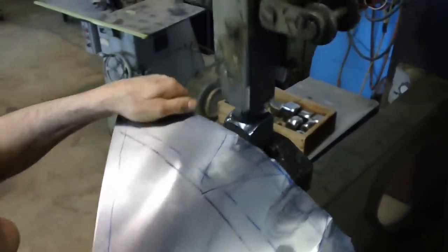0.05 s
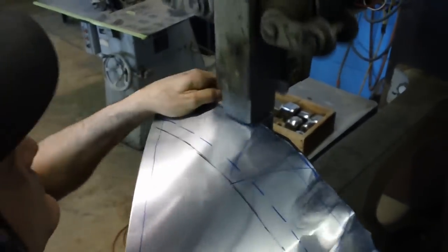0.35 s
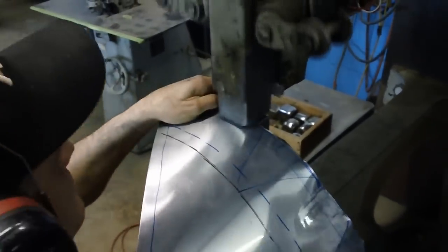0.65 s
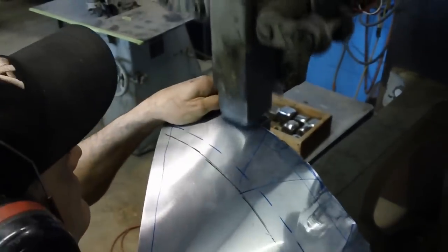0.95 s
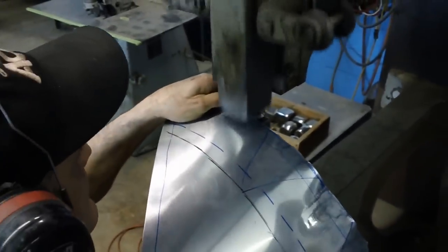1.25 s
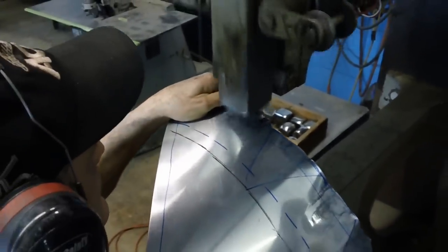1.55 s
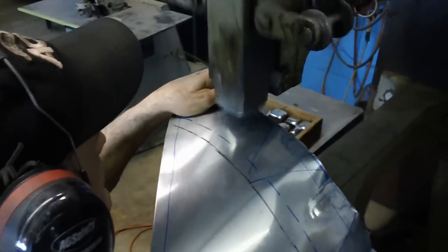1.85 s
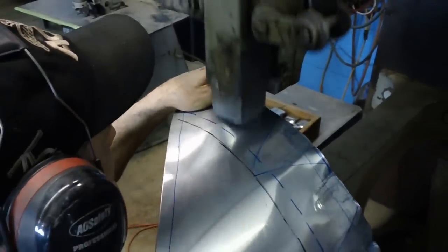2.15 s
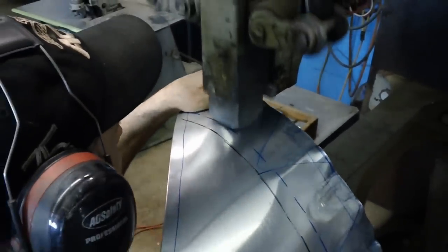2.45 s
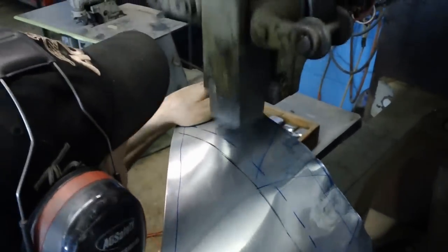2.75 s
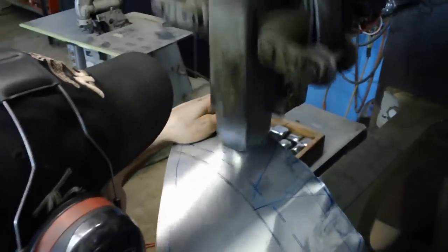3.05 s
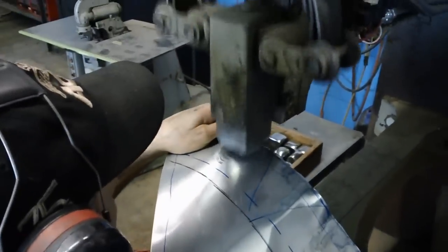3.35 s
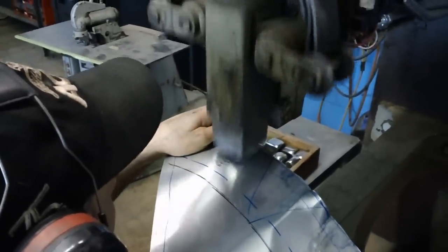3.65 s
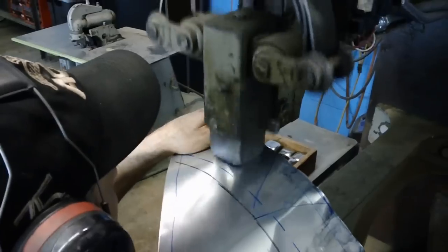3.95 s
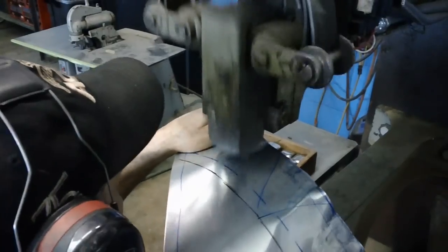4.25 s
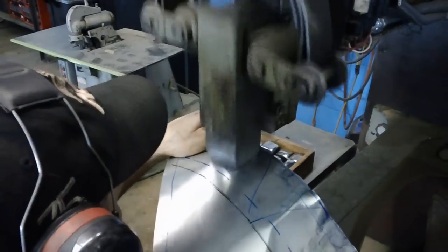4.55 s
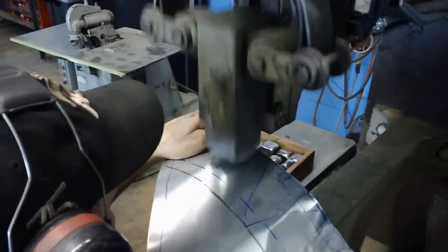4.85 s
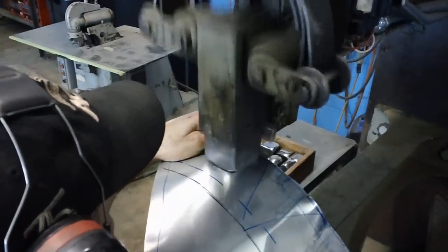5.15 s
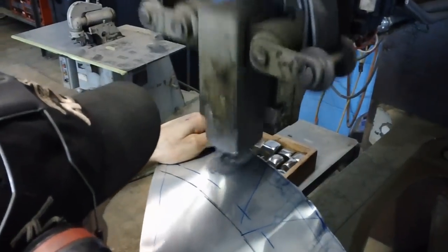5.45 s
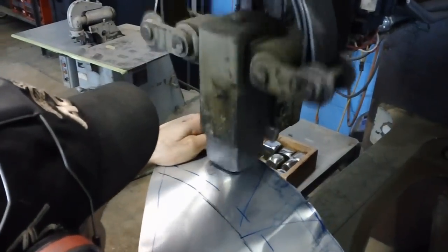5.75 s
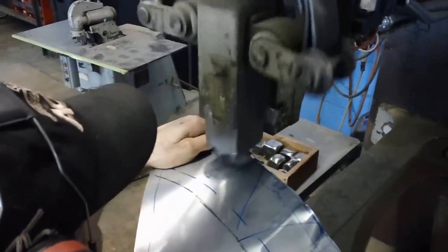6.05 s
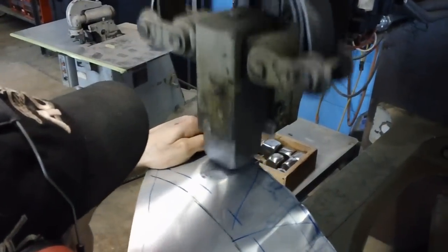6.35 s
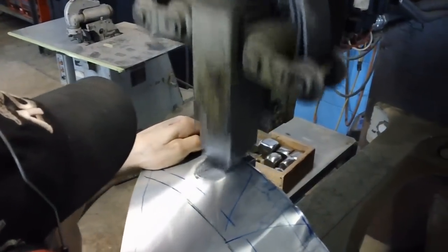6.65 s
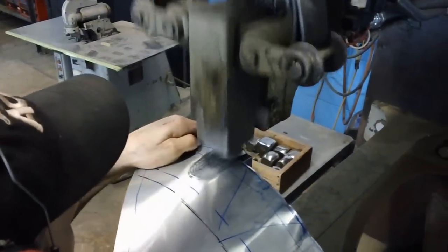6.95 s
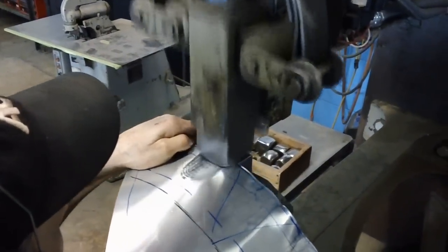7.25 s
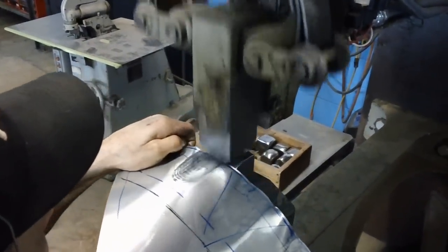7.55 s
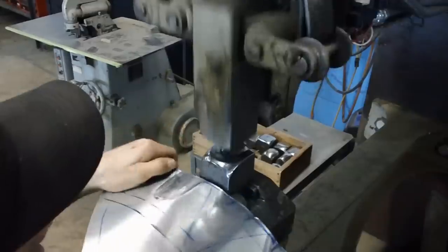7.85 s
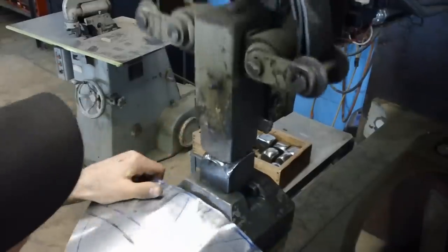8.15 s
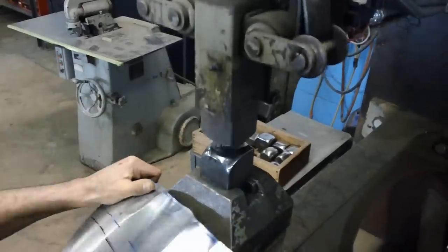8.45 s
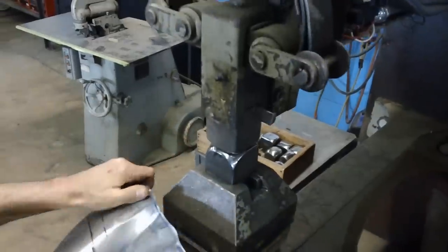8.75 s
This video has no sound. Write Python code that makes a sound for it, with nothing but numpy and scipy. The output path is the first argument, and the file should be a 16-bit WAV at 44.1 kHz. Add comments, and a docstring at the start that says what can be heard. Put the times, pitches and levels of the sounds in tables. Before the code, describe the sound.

A small power hammer works a metal sheet in a workshop, heard from close by over a steady motor hum and rumble. Loose joints knock and clink at the very start, and at about 0.3 seconds the hammer catches the sheet with one hard pop. From 0.4 seconds, fast blows follow without a break, about eleven a second, their pace drifting slightly. Each has a sharp steel crack, a short thump and a clanging ring from the sheet. The ring is duller around 2 to 3 seconds, then brighter near 3.5 and from 5 onward, with deeper booming around 6. The hammering ends at about 8 seconds with a sharp, high ping. Quieter knocks follow as the machine slows and the hum drops. From 8.4 seconds the sheet scrapes lightly away, and a small part tinks near 8.7.

```python
"""Fast, clanging hammer blows, about eleven a second: a small power hammer stretches a metal sheet.
Each blow cracks between the dies (the two steel hammer faces), thumps the spot under them and sets
the whole sheet ringing, more or less as it is shifted. A motor hums, and loose joints clatter as
the hammer starts and stops. At the end the sheet scrapes away and a small part tinks.
The microphone is close by, and a limiter flattens the loudest peaks."""
import sys
import numpy as np
from scipy.fft import rfft, irfft, next_fast_len
from scipy.io import wavfile
from scipy.ndimage import uniform_filter1d, minimum_filter1d, map_coordinates

SR = 44100
rng = np.random.default_rng(int(sys.argv[2]) if len(sys.argv) > 2 else 0)


def to_wav(sig):
    """Store sig (one row per channel, or 1-D mono) as 16-bit WAV at the path in sys.argv[1].

    Samples outside -1..1 are clipped; the rate is SR.
    """
    pcm = np.clip(np.atleast_2d(sig), -1, 1) * 32767
    pcm = np.round(pcm).astype(np.int16)
    wavfile.write(sys.argv[1], SR, pcm.T)  # frames by channels


N = 388065
TIME = np.arange(N) / SR
AGE = np.arange(2 ** 14) / SR  # seconds since a blow

# loose knocks as the hammer starts and stops: (time [s], level [dB])
LOOSE_KNOCKS = [(0.003, -18), (0.064, -16), (0.083, -17), (0.119, -16.5), (0.183, -14.5), (0.201, -13.5),
                (0.24, -6.5), (8.149, -29), (8.218, -26.5), (8.289, -26.5), (8.385, -26.5), (8.502, -29),
                (8.621, -29.5), (8.65, -29)]
# tone colour of steel hitting the sheet: (frequency [Hz], level [dB])
CRACK_SPECTRUM = [(45, -27), (160, -14), (420, 17), (920, 3), (1750, 7.5), (3050, 8), (4600, 6), (7600, 6),
                  (10400, 3.5), (12400, -7), (14900, -8)]
# speed of the crank, sagging where the dies bite harder: (time [s], speed [blows per second])
CRANK_SPEED = [(0.38, 10.15), (0.8, 10.41), (1.02, 10.09), (1.25, 10.71), (1.7, 10.09), (1.97, 9.3),
               (2.61, 10.31), (2.89, 11.44), (3.27, 11.27), (3.76, 11.92), (3.89, 11.27), (4.23, 10.67),
               (4.62, 11.56), (5.14, 12.04), (5.92, 11.75), (6.4, 12.1), (6.54, 11.82), (6.93, 12.06),
               (7.79, 10.54), (7.95, 9.63)]
# how hard the dies crack on the sheet: (time [s], level [dB])
CRACK_LEVEL = [(0.38, -26.5), (0.51, -22), (1.6, -20), (1.73, -18.5), (2.58, -20.5), (3.42, -14.5),
               (3.89, -19.5), (5.23, -13.5), (5.5, -20.5), (6.6, -20), (6.74, -15), (7.27, -23),
               (7.45, -19.5), (7.65, -23), (7.95, -26)]
CRACK_SCATTER_DB = 1.14  # random change from blow to blow


def amp(db):
    """Turn decibels into a gain to multiply by."""
    return 10 ** (np.asarray(db) / 20)


def unit(x):
    """Scale each row to an average (rms) level of 1."""
    return x / np.sqrt(np.mean(x ** 2, axis=-1, keepdims=True) + 1e-20)


def along(points, hz):
    """Read between (frequency, value) points on a logarithmic frequency scale."""
    f, v = np.transpose(points)
    return np.interp(np.log(hz + 1), np.log(f + 1), v)


def filtered(x, response):
    """Multiply each frequency in x by the gain that response gives it."""
    n = x.shape[-1]
    m = next_fast_len(n)
    return irfft(rfft(x, m) * response(np.fft.rfftfreq(m, 1 / SR)), m)[..., :n]


def coloured(x, spectrum):
    """Give white noise a tone colour, at an average level of 1."""
    return unit(filtered(x, lambda hz: amp(along(spectrum, hz))))


def fade(t60, attack):
    """A struck thing swells quickly (attack), then dies away by 60 dB in its ring time (t60 seconds)."""
    return np.exp(-np.log(1000) * AGE / t60) * (1 - np.exp(-AGE / attack))


def placed(times, sounds):
    """Start one sound at each time and add them up."""
    out = np.zeros(N + SR)
    for s, sound in zip(times, sounds):
        out[max(round(s * SR), 0):][:len(sound)] += sound
    return out[:N]


def dense_modes(count, spectrum, likeness):
    """Countless modes (natural tones), a row per blow. The metal shifts, so high ones change first."""
    # likeness of each blow to the last: (frequency [Hz], likeness [0 to 1])
    blows = rfft(rng.standard_normal((count, len(AGE))))
    hz = np.fft.rfftfreq(len(AGE), 1 / SR)
    kept = np.clip(along(likeness, hz), 0, .98)
    for k in range(1, count):
        blows[k] = kept * blows[k - 1] + np.sqrt(1 - kept ** 2) * blows[k]
    return unit(irfft(blows * amp(along(spectrum, hz))))


def ringing(x, attack):
    """Let each frequency band die away at its own speed."""
    # how long the sheet rings in the room: (frequency [Hz], ring time [s])
    bands = [(105, 0.43), (310, 0.21), (1020, 0.31), (2550, 0.2), (6100, 0.21), (13900, 0.4)]
    centres = np.transpose(bands)[0]
    share = lambda k: lambda hz: along(np.c_[centres, np.arange(len(bands)) == k], hz)
    return sum(filtered(x, share(k)) * fade(t60, attack) for k, (_, t60) in enumerate(bands))


def blow_times():
    """One blow lands for each turn of the crank."""
    first_blow_s = .376
    turns = np.cumsum(np.interp(TIME, *np.transpose(CRANK_SPEED))) / SR
    first, last = np.interp([first_blow_s, CRANK_SPEED[-1][0]], TIME, turns)
    return np.interp(first + np.arange(round(last - first) + 1), turns, TIME)


def per_blow(curve, scatter_db):
    """Read a level curve at each blow, with no two blows quite alike."""
    times = blow_times()
    return np.interp(times, *np.transpose(curve)) + scatter_db * rng.standard_normal(len(times))


def motor():
    """The drive hums and rumbles, louder while the crank is turning."""
    # tone colour of the workshop rumble: (frequency [Hz], level [dB])
    rumble_spectrum = [(27, -8), (62, -7), (135, -5), (255, 7.5), (520, 3), (1020, 7.5), (2050, 2.5),
                       (5100, -7.5), (10100, -22), (14900, -45)]
    # tones of the motor and belt: (frequency [Hz], level [dB])
    hum_tones = [(130, -66), (260, -51.5), (386, -57.5), (759, -51)]
    crank_db = np.interp(TIME, [.05, .55, 8.1, 8.65], [5.5, 6.5, 5.5, -5.5])
    rumble = amp(crank_db - 39.5) * coloured(rng.standard_normal(N), rumble_spectrum)
    drift = lambda rate: map_coordinates(rng.standard_normal(int(N * rate / SR) + 4), [TIME * rate])
    hum = sum(amp(db) * np.sqrt(2) * np.sin(2 * np.pi * hz * TIME + drift(rate=14))
              for hz, db in hum_tones)
    return rumble + hum * amp(crank_db)


def linkage():
    """Slack joints knock at start and stop, and tick each time the hammer swings back."""
    # tone colour of the joints: (frequency [Hz], level [dB])
    joint_spectrum = [(55, -24), (240, 6.5), (620, 11.5), (1150, 7.5), (2150, 4.5), (3400, -3), (5600, -10),
                      (9100, -21.5), (14900, -43)]
    likeness = [(320, 0.88), (5100, 0.17)]
    times, db = np.transpose(LOOSE_KNOCKS)
    body = dense_modes(len(times), joint_spectrum, likeness)
    knocks = amp(-10) * body * fade(t60=0.036, attack=0.00022)
    knocks += amp(-8.5) * ringing(body, attack=0.0014)
    blows = blow_times()
    timing, force = rng.standard_normal((len(blows) - 1, 2)).T
    returns = blows[:-1] + np.diff(blows) * (.78 + .05 * timing)
    ticks = dense_modes(len(returns), joint_spectrum, likeness) * fade(t60=0.053, attack=0.00054)
    tick_db = -27 + 4.6 * np.tanh(force)
    return placed(times, amp(db)[:, None] * knocks) + placed(returns, amp(tick_db)[:, None] * ticks)


def pins():
    """Steel pins clink each time a slack joint knocks."""
    times, knock_db = np.transpose(LOOSE_KNOCKS)
    # (frequency [Hz], level [dB], ring time [s])
    modes = [(2015, -8, 0.055), (3310, -11.5, 0.045), (5100, -9, 0.017), (6660, -20, .012)]
    hz, db, t60 = np.transpose(modes)[:, :, None]
    chance = rng.standard_normal((len(times), 2, len(modes), 1))
    phase = 2 * np.pi * hz * (1 + 0.014 * chance[:, 0]) * AGE  # a joint's load shifts its pitch
    clinks = amp(db + 5.2 * np.tanh(chance[:, 1])) * np.sin(phase) * fade(t60, attack=0.00024)
    return placed(times, amp(knock_db)[:, None] * clinks.sum(axis=1))


def first_bite():
    """The dies first catch the sheet: a tick, then one hard pop and a push of air as it snaps flat."""
    noise = coloured(rng.standard_normal(len(AGE)), CRACK_SPECTRUM)
    tick = amp(-3.5) * fade(t60=0.01, attack=.00024) * noise
    pop_hz = 655
    pop = -amp(21) * fade(t60=0.0083, attack=0.00065) * np.sin(2 * np.pi * pop_hz * AGE)
    push = -amp(-11) * fade(t60=0.0095, attack=0.0008)
    return placed([.2727, .2744], [tick, pop + push])


def die_crack():
    """Steel meets the sheet: a snap, a short crack and a bright sizzle that rings on."""
    # tone colour of the sizzle: (frequency [Hz], level [dB])
    sizzle_spectrum = [(42, -60), (95, 3), (255, 8.5), (820, 13), (2050, -1.5), (3150, 5), (4600, 2.5),
                       (8100, 4), (10400, -2.5), (12400, -18), (14900, -12)]
    times, crack_db = blow_times(), per_blow(CRACK_LEVEL, CRACK_SCATTER_DB)
    likeness = [(320, 0.87), (1450, 0.41), (7900, 0.09)]
    contact = dense_modes(len(times), CRACK_SPECTRUM, likeness)
    # each landing favours different tones of the dies
    band_hz = np.linspace(0, SR / 2, 48)
    favour_db = 1.87 * rng.standard_normal((len(times), len(band_hz)))
    contact = unit(filtered(contact, lambda hz: amp([np.interp(hz, band_hz, row) for row in favour_db])))
    snap = amp(10) * fade(t60=0.025, attack=0.000068)
    crack = contact * (snap + amp(5.5) * fade(t60=0.054, attack=0.002))
    sizzle = amp(-1) * ringing(dense_modes(len(times), sizzle_spectrum, likeness), attack=0.001)
    return placed(times, amp(crack_db)[:, None] * (crack + sizzle))


def die_ring():
    """The dies ping at each blow, louder the faster the hammer comes down."""
    # short tones of the steel dies: (frequency [Hz], level [dB], ring time [s])
    die_modes = [(3100, 10, .013), (4910, 6.5, .011)]
    db_per_speed, pitch_scatter = 5, 0.031  # dB per extra blow a second; the pinch shifts the pitch
    times, crack_db = blow_times(), per_blow(CRACK_LEVEL, CRACK_SCATTER_DB)
    speed = np.interp(times, *np.transpose(CRANK_SPEED))
    strength = amp(crack_db + db_per_speed * (speed - speed.mean()))
    hz, db, t60 = np.transpose(die_modes)[:, :, None]
    chance = rng.standard_normal((len(times), 2, len(die_modes), 1))
    phase = 2 * np.pi * hz * (1 + pitch_scatter * chance[:, 1]) * AGE
    pings = amp(db + 2 * np.tanh(chance[:, 0])) * np.sin(phase) * fade(t60, attack=0.00049)
    return placed(times, strength[:, None] * pings.sum(axis=1))


def clang():
    """Ripples spread over the free sheet: a dense wash of sound with a few long tones standing out."""
    # how freely the sheet clangs, low where it lies flat on the die: (time [s], level [dB])
    clang_level = [(0.38, -28), (0.65, -19), (1.18, -22.5), (1.34, -26), (1.76, -34), (2.0, -28),
                   (2.25, -32.5), (2.9, -25.5), (3.24, -25.5), (3.42, -17), (3.65, -16), (3.88, -26.5),
                   (4.61, -22.5), (4.81, -16.5), (6.3, -19.5), (6.43, -21.5), (6.74, -15), (7.95, -19.5)]
    # tone colour of the wash: (frequency [Hz], level [dB])
    wash_spectrum = [(55, -40), (135, -28), (235, 1), (335, -4), (610, -2.5), (1020, -2.5), (1720, -1),
                     (2650, -4), (4100, -10.5), (7100, -20.5), (11100, -42), (14900, -46)]
    # long tones of the sheet: (frequency [Hz], level [dB], ring time [s])
    sheet_modes = [(253.7, -11.5, 0.36), (390.5, -13, 0.3), (558.6, 1, 0.22), (695, -0.5, 0.24),
                   (744, 3.5, 0.22), (842, 7, 0.17), (984, 6.5, 0.21), (1055, -6, 0.99),
                   (1155.6, 8.5, 0.14), (1305, -3, 0.41), (1503, -8, 0.24), (1648, -1, 0.33),
                   (2067, -2.5, 0.24), (2353, -9.5, 0.7), (3285, -31.5, 0.99)]
    # their boost while the sheet is held by its edge, going in and out: (time [s], level [dB])
    edge_boost = [(.5, 0.5), (.8, 5.5), (1.17, 6.5), (1.4, 0), (6.6, -3), (7.9, 3.5)]
    times, clang_db = blow_times(), per_blow(clang_level, scatter_db=0.23)
    likeness = [(320, .9), (1250, .74), (5100, .35)]
    wash = amp(8) * ringing(dense_modes(len(times), wash_spectrum, likeness), attack=0.00035)
    mode_db = np.transpose(sheet_modes)[1]
    tones = np.array([np.exp(2j * np.pi * hz * AGE) * fade(t60, attack=0.0031)
                      for hz, _, t60 in sheet_modes])
    # where the die lands sets each tone's strength and phase
    chance = rng.standard_normal((len(times), 2, len(sheet_modes)))
    strength = amp(-8 + mode_db + 2.5 * chance[:, 0])
    phase = np.cumsum(1.364 * chance[:, 1], axis=0)
    boost = amp(np.interp(times, *np.transpose(edge_boost)))[:, None]
    long_tones = boost * ((strength * np.exp(1j * phase)) @ tones).real
    return placed(times, amp(clang_db)[:, None] * (wash + long_tones))


def spot_knocks(times):
    """Tight spots in the sheet knock at each blow, swelling and fading as they pass between the dies."""
    # tight spots: (middle time [s], half length [s], level [dB], frequency [Hz])
    tight_spots = [(1.31, 0.13, -8.5, 513), (2.375, 0.27, -12, 317), (2.736, 0.14, -14, 543),
                   (3.716, 0.08, -8.5, 448), (4.02, 0.16, -11.5, 480), (4.35, .18, -4, 418),
                   (5.494, 0.13, -11, 324), (6.72, 0.18, -20, 440)]
    plain_gain, plain_hz = amp(-31), 480  # the knock between those spots
    pitch_scatter, overtone_ratio = 0.054, 2.1
    middle, half, db, hz = np.transpose(tight_spots)
    spot_gains = amp(db) * np.exp(-((times[:, None] - middle) / half) ** 2)
    gain = spot_gains.sum(axis=1) + plain_gain
    pitch = (spot_gains @ hz + plain_gain * plain_hz) / gain
    pitch *= 1 + pitch_scatter * rng.standard_normal(len(times))
    phase = 2 * np.pi * pitch[:, None] * AGE
    tone = np.sin(phase) + amp(-10) * np.sin(overtone_ratio * phase)
    return amp(15) * gain[:, None] * tone * fade(t60=0.021, attack=0.0031)


def thump():
    """The patch under the dies flexes briefly and thuds into the frame; the floor echoes it back."""
    # how deeply the sheet booms around the dies: (time [s], level [dB])
    boom_level = [(0.38, -21.5), (0.99, -22), (1.37, -18), (1.86, -35.5), (3.03, -17.5), (3.21, -35),
                  (3.76, -18.5), (3.94, -25), (5.02, -22.9), (5.74, -8.5), (6.97, -16.5), (7.35, -39),
                  (7.95, -53)]
    # how much of the blow thuds into the frame: (time [s], level [dB])
    frame_level = [(.4, -31), (.85, -55), (1.4, -33), (2.5, -20.5), (3.5, -36), (3.9, -12.5), (4.7, -41),
                   (5.6, -18.5), (6.5, -16), (6.9, -28), (7.9, -31)]
    boom_hz, overtone_hz, frame_hz = 246, 548, 100
    times = blow_times()
    boom_db = per_blow(boom_level, scatter_db=0.4)[:, None]
    frame_db = per_blow(frame_level, scatter_db=0.4)[:, None]
    deep_fade = fade(t60=0.032, attack=0.0014) + amp(-27.5) * fade(t60=0.13, attack=0.0072)
    deep = np.sin(2 * np.pi * boom_hz * AGE) * deep_fade
    overtone = amp(-12.5) * np.sin(2 * np.pi * overtone_hz * AGE) * fade(t60=0.092, attack=0.0039)
    boom = amp(11.5 + boom_db) * (deep + overtone)
    frame = -amp(frame_db) * np.sin(2 * np.pi * frame_hz * AGE) * fade(t60=0.042, attack=0.00087)
    flex = boom + spot_knocks(times) + frame
    echoes = [(.0163, -12.5), (.0284, -18)]  # (delay [s], level [dB])
    return placed(times, flex) + sum(amp(db) * placed(times + delay, flex) for delay, db in echoes)


def tink():
    """Steel rings unevenly: the dies as the sheet slips out, then a small part, touched and bouncing."""
    # (time [s], frequency [Hz], level [dB], ring time [s])
    rings = [(7.952, 7960, 5, 0.0074), (7.953, 8250, -40, 0.28), (7.954, 4340, -38, 0.86),
             (8.693, 5450, -29.5, .07), (8.712, 5340, -43, .3), (8.7, 10250, -47, 0.33)]
    out = np.zeros(N)
    for start, hz, db, t60 in rings:
        chatter = np.cumsum(0.07 * rng.standard_normal(len(AGE)))
        tone = np.sin(2 * np.pi * hz * AGE + chatter)
        out += placed([start], [amp(db) * tone * fade(t60, attack=0.00029)])
    return out


def slide():
    """The sheet scrapes lightly over the lower die as it is drawn away."""
    # (time [s], level [dB])
    level = [(8.41, -75), (8.44, -50), (8.57, -57), (8.72, -43), (8.8, -58)]
    # (frequency [Hz], level [dB])
    spectrum = [(300, -20), (2500, 7), (6000, 0), (10200, 2), (12000, -7), (14900, -6)]
    return amp(np.interp(TIME, *np.transpose(level))) * coloured(rng.standard_normal(N), spectrum)


def scene():
    """Hammer, sheet and motor add up at one microphone."""
    blows = die_crack() + die_ring() + clang() + thump()
    clatter = linkage() + pins()
    sheet_in_and_out = first_bite() + tink() + slide()
    return (blows + clatter + sheet_in_and_out + motor())[None]


def limiter(x, ceiling_db, hold_s):
    """Turn loud peaks down within about a millisecond; the first snap of a blow partly gets through."""
    size = max(int(hold_s * SR), 3)
    needed_gain = np.minimum(1, amp(ceiling_db) / (np.abs(x) + 1e-9))
    held_gain = minimum_filter1d(needed_gain, size, origin=(size - 1) // 2)
    return x * uniform_filter1d(held_gain, size)


def record(dry):
    """The microphone loses deep bass and a thin slice of treble; peaks and the highest highs are cut."""
    bass_hz, notch_hz, top_hz = 32, 12490, 15400
    low_cut = lambda hz: (1j * hz / (bass_hz + 1j * hz)) ** 4
    notch = lambda hz: amp(-22 * np.exp(-((hz - notch_hz) / 280) ** 2))
    heard = filtered(dry, lambda hz: low_cut(hz) * notch(hz))
    flattened = np.clip(limiter(heard, ceiling_db=-3, hold_s=.0025), -.76, .76)
    return filtered(flattened, lambda hz: hz < top_hz)


dry = scene()
out = record(dry)
to_wav(out)
```